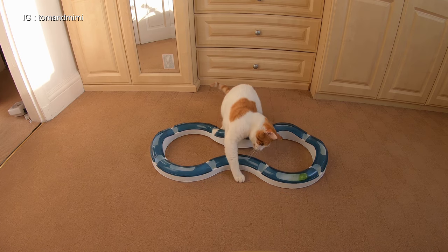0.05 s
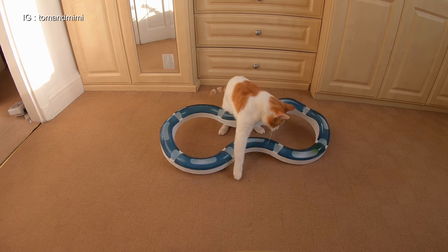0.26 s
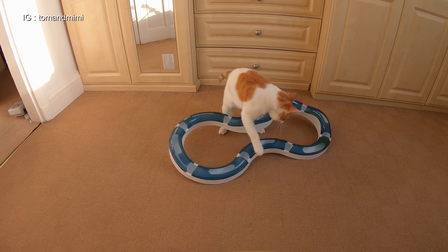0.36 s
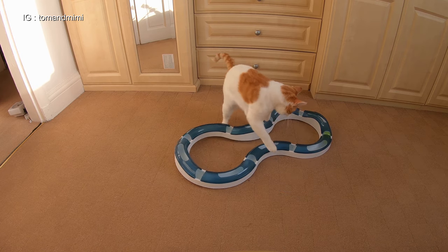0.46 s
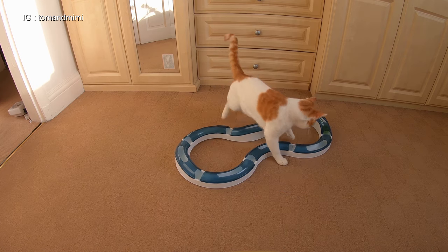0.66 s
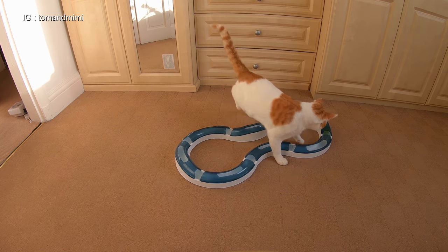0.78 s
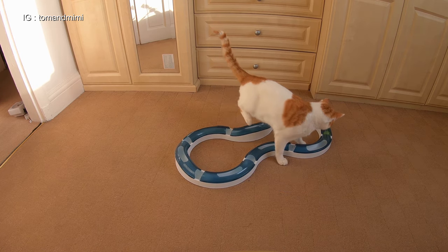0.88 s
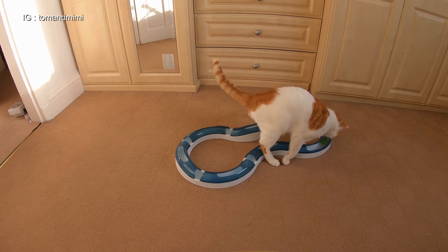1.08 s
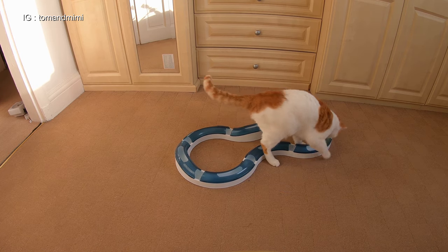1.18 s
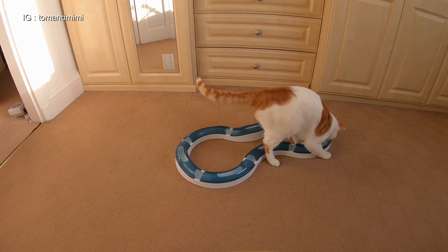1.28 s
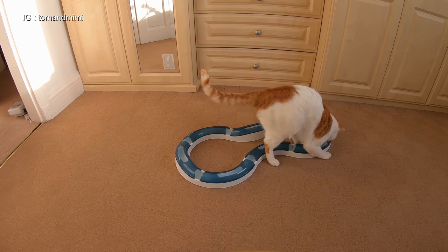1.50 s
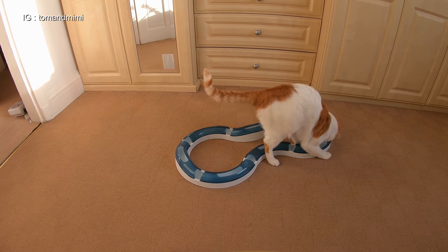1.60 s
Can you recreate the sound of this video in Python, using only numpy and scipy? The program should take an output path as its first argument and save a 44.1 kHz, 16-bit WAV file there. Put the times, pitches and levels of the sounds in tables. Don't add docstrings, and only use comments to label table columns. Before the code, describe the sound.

A cat's paws rattle a hollow plastic ball track, with sharp clicks and a clattering shove on carpet

```python
import sys
import numpy as np
from scipy import signal
from scipy.fft import rfft, irfft
from scipy.io import wavfile
from scipy.ndimage import uniform_filter1d

SR = 44100
rng = np.random.default_rng(int(sys.argv[2]) if len(sys.argv) > 2 else 0)


def int16_out(signal):
    q = np.round(np.clip(np.atleast_2d(signal).T, -1, 1) * 32767)
    wavfile.write(sys.argv[1], SR, q.astype(np.int16))


def makeup_ratio(level_db):
    decades = np.asarray(level_db, float) / 20
    return 10 ** decades


N = 72765

# start in seconds, peak level in dB, pitch in Hz, crack level in dB, crack pitch in Hz.
CLICKS = [(0, -33, 960, -6.5, 4440), (.018, -35, 1430, -28, 2800), (.187, -40, 1390, -6, 4400),
          (.208, -27.5, 2200, -25, 5170), (.219, -43, 1500, 1.5, 4850), (.2235, -29.5, 1040, -2.5, 2580),
          (.238, -37, 1500, -17, 2930), (.253, -45, 2040, -11, 2830), (.2765, -23, 3300, -4.5, 5580),
          (.2855, -27, 1900, -11, 5800), (.3755, -29, 930, -2.5, 3000), (.393, -31.5, 1050, -6, 2900),
          (.401, -31.5, 1500, -8.5, 7100), (.416, -31, 1290, -9.5, 2790), (.452, -33.5, 1050, -7, 3160),
          (.4615, -21, 980, -7.5, 4000), (.473, -34, 1160, -8, 2800), (.512, -29.5, 1480, -5, 3040),
          (.522, -42, 1030, -2.5, 4800), (.6435, -19, 1360, -10, 4200), (.691, -32, 1800, -4.5, 4200),
          (.741, -31, 1900, -23, 4200), (.7532, -16, 1646, -10.5, 4350), (.805, -32, 850, -1, 2700)]
SHOVE_CLATTER = [(.560, -23.5, 1086, -16.5, 2200), (.564, -17.5, 1500, -20.5, 2500),
                 (.568, -21, 1127, -6, 3000), (.572, -16.5, 1550, -11.5, 2300),
                 (.576, -17, 1620, -11, 4770), (.580, -20.5, 1500, -10, 3000),
                 (.584, -21.5, 1700, -10, 3200), (.588, -24.5, 1576, -18.5, 2700),
                 (.592, -24, 1350, -17.5, 3030), (.599, -30.5, 1270, -6, 2400),
                 (.607, -39, 955, -15.5, 2200)]
RESTING_TAPS = [
    (1.087, -41.5, 1400, -13.5, 3100),
    (1.096, -44, 727, -9, 1980),
    (1.147, -53.5, 4500, 2.5, 4900),
    (1.148, -59.5, 7000, 2.5, 7600),
    (1.155, -39, 1060, -30.5, 2920),
    (1.165, -45, 1150, -13, 2187),
    (1.532, -47.5, 640, -16.5, 2700),
    (1.540, -53, 654, -24, 2300),
]
PAW_NUDGES = [(.819, -20, 860, -20.5, 2420), (.836, -28.5, 840, -37, 2500), (1.02, -43.5, 827, -29, 3500),
              (1.036, -36, 860, -28.5, 2380), (1.05, -48, 834, -26, 3500), (1.195, -41, 910, -14, 3100),
              (1.335, -53, 1103, -28, 2300), (1.356, -44, 706, -37, 2487), (1.373, -47, 767, -37, 2430),
              (1.433, -64.5, 650, -24, 2755), (1.451, -45.5, 710, -28, 2790), (1.47, -60, 690, -20, 2460)]
JOINT_CHATTER = [(.2115, -32.5, 1700, -23, 2300), (.228, -36, 1100, -25, 2196),
                 (.243, -32, 1000, -17, 2390), (.299, -33.5, 2200, -18.5, 2500),
                 (.310, -33, 1150, -20.5, 2600), (.355, -37.5, 950, -5, 3200),
                 (.3975, -29, 1500, -19.5, 2220), (.406, -35.5, 1500, -10, 2625),
                 (.425, -34, 1600, -8, 4400), (.455, -27.5, 1600, -17, 2300), (.466, -29, 1200, 0, 2800),
                 (.482, -36, 900, -26.5, 2435), (.491, -38.5, 1100, -9, 2200), (.515, -34, 1100, -1, 2800),
                 (.525, -33.5, 1700, -24, 2300), (.533, -45, 800, -12, 2215), (.650, -27, 1900, -6.5, 2600),
                 (.6555, -25, 1100, -17, 2200), (.666, -32, 1100, -12, 2300),
                 (.675, -31.5, 1400, -10.5, 2390), (.701, -31.5, 1200, -26, 2600),
                 (.758, -25, 1600, -5.5, 2555), (.7655, -21, 1050, -21.5, 2196),
                 (.773, -30, 1100, -19, 2300), (.785, -30.5, 1000, -16.5, 2410),
                 (.812, -31.5, 1000, -18.5, 2300), (.845, -29, 1000, -22, 2300)]
# pitch in Hz, level in dB, time to fade by 60 dB in seconds.
TRACK_WALLS = [(620, 4.5, 0.028), (860, 12, 0.015), (1099, -2, 0.036), (1189, 0, 0.034), (1454, 7.5, 0.019),
               (1534, 8.5, 0.019), (1900, -2, 0.059), (2300, 7, 0.03), (2700, 14, 0.0079),
               (3200, 1.5, 0.065), (4000, -30.5, 0.029), (4200, -19.5, 0.024), (5200, -33, 0.0044)]
# time in seconds, level in dB, brightness in dB.
MOTION = [(0, -47, -4), (0.077, -48.5, -32.5), (.15, -53.5, -11), (.21, -47, -8.5), (.265, -46.5, -21),
          (.34, -52, -28.5), (.37, -43, -4), (0.431, -51, -2.5), (.555, -48.5, -6.5), (.61, -53, -2),
          (.68, -40, -16.5), (0.746, -44.5, -11), (0.83, -39, -11), (.88, -82, -18.5), (1.002, -63.5, -26),
          (1.3, -69, -35), (1.392, -61, -30), (1.65, -65, -27.5)]
# pitch in Hz, level in dB.
RATTLE_COLOUR = [(450, -12), (700, -2.5), (1300, -4), (2200, -3.5), (3500, -13.5)]
# pitch in Hz, level in dB per Hz.
RUSTLE_COLOUR = [(1500, -6.5), (2500, 0), (4000, -4.5), (7500, -16.5), (10000, -20), (15000, -26)]
# start in seconds, level in dB, pitch in Hz, time to fade by 60
# dB in seconds (.3 at most).
THUDS = [(.025, -62, 62, .1), (.21, -60, 65, .08), (.27, -60, 70, .08), (.355, -48, 144, 0.047),
         (.385, -29, 150, 0.03), (.385, -50, 69.5, 0.05), (0.475, -54, 30.8, 0.2), (.566, -24, 165, 0.074),
         (.562, -30.5, 256, 0.12), (0.561, -29, 346.2, .1), (.566, -28.5, 444, .08),
         (0.563, -28, 61.2, 0.1), (.59, -25, 140, 0.075), (0.601, -29.5, 66.5, 0.26),
         (0.598, -32, 28.85, 0.98), (.725, -26, 79, 0.045), (.765, -37.5, 63.6, 0.19), (.79, -43, 28, 0.4),
         (.85, -41, 30.4, 0.19), (1.10, -66, 140, .1)]
# pitch in Hz, time to fade by 60 dB in seconds, level in dB.
ROOM_FADE = [(175, 0.34, 0.5), (500, 0.21, -1.5), (1500, 0.24, -1.5), (4000, 0.26, -6), (9300, 0.17, 7)]
# pitch in Hz, likeness from -1 to 1.
LIKENESS = [(100, 1), (330, 1), (700, 0.35), (3000, 0.32), (6000, 0.33), (11000, -0.6)]
# pitch in Hz, level in dB per Hz.
AIR_COLOUR = [(18, -11), (30, -14), (60, -23.5), (110, -18.5), (328, -7.5), (511, -13.5), (774, -4.5),
              (928, -12), (1270, -6), (1830, -25.5), (15000, -44)]

SNAP_DB, WALLS_DB, CRACK_DB = 2, -13, 0
WALL_REACH_OCTAVES = 0.99
WALL_LUCK_DB, WALL_DETUNE, WALL_DAMPING = 3.0, 0.088, 0.66
CRACK_WIDTH_HZ, CRACK_FADE_S, SPARK_FADE_S = 1500, .002, .003
BLOW_DELAY_S = .001
SHARP_S, CLATTER_S, TAP_S, PADDED_S, LOOSE_S = .00012, .0014, .0005, .003, .0007
GRAINS_PER_S, GRAIN_SPREAD_DB, GRAIN_CYCLES = 1500, 3, 20
RATTLE_DB, RUSTLE_DB, RUMBLE_DB = -3, 0.5, -23.5
THUD_RISE_S, THUD_LEFT_DB = .006, -4
FIRST_WALL_S, ROOM_BUILD_S, CONTACT_SHIFT_S = .006, .003, .011
ROOM_DB, ROOM_LEFT_DB, TRACK_LEFT_DB, AIR_DB = 2.5, -0.6, -1.9, -69.5
TRACK_LOW_HZ, MIC_TOP_HZ, ABOVE_TOP_DB = 215, 11390, -18


def rms_one(x):
    return x / np.sqrt(np.mean(x ** 2) + 1e-20)


def at_hz(points, hz, column=1):
    table = np.array(points)
    return np.interp(np.log(hz + 1e-3), np.log(table[:, 0]), table[:, column])


def coloured(noise, spectrum):
    length = noise.shape[-1]
    hz = np.fft.rfftfreq(length, 1 / SR)
    return rms_one(irfft(rfft(noise) * makeup_ratio(at_hz(spectrum, hz)), length))


def band(x, low_hz, high_hz):
    return signal.sosfilt(signal.butter(2, [low_hz, high_hz], "band", fs=SR, output="sos"), x)


def ring(x, hz, t60):
    radius = makeup_ratio(-60 / (t60 * SR))
    turn = 2 * np.pi * hz / SR
    return signal.lfilter([0, np.sin(turn)], [1, -2 * radius * np.cos(turn), radius * radius], x + 1e-18)


def ears(left_db):
    return makeup_ratio([[left_db / 2], [-left_db / 2]])


def wall_ringing(blow_hz, luck, t):
    walls = np.zeros(len(t))
    for j, ((hz, level_db, t60), (level_luck, pitch_luck)) in enumerate(zip(TRACK_WALLS, luck)):
        distance = np.log2(hz / blow_hz) / WALL_REACH_OCTAVES
        db = WALLS_DB + level_db + WALL_LUCK_DB * level_luck - 5.22 * distance ** 2
        tone = np.sin(2 * np.pi * hz * (1 + WALL_DETUNE * pitch_luck) * t)
        walls += (-1) ** j * makeup_ratio(db) * tone * makeup_ratio(-60 * t / (WALL_DAMPING * t60))
    return walls


def strikes(rows, contact_s, spark_db, cycles):
    length = 4096
    out = np.zeros(N + length)
    t = np.arange(length) / SR
    chance = rng.standard_normal((len(rows), len(TRACK_WALLS), 2))
    noise = rng.standard_normal((len(rows), 2, length))
    rise = 1 - np.exp(-(t / contact_s) ** 2)
    for (start, db, hz, crack_db, crack_hz), luck, (hiss, fizz) in zip(rows, chance, noise):
        snap = np.sin(2 * np.pi * hz * t) * np.exp(-t * hz / cycles) / np.sqrt(cycles)
        focus = rms_one(ring(fizz, crack_hz, 2.16 / CRACK_WIDTH_HZ))
        focus = focus * np.exp(-t / (CRACK_FADE_S + 2 * contact_s))
        spark = makeup_ratio(spark_db) * coloured(hiss, RUSTLE_COLOUR) * np.exp(-t / SPARK_FADE_S)
        crack = makeup_ratio(CRACK_DB + crack_db) * (spark + focus)
        blow = makeup_ratio(SNAP_DB) * snap + wall_ringing(hz, luck, t) + crack
        i = int((start + BLOW_DELAY_S) * SR)
        out[i:i + length] += makeup_ratio(db) * blow * rise
    return out[:N]


def track_motion():
    times, levels_db, brights_db = np.transpose(MOTION)
    t = np.arange(N) / SR
    level_db = np.interp(t, times, levels_db)
    bright_db = np.interp(t, times, brights_db)
    sizes = makeup_ratio(GRAIN_SPREAD_DB * np.minimum(rng.exponential(1, N), 4)) * rng.choice([-1, 1], N)
    grains = sizes * (rng.random(N) < GRAINS_PER_S / SR)

    patch = rng.integers(0, 30, N)
    rattle = np.zeros(N)
    for k, hz in enumerate(np.geomspace(450, 3500, num=30)):
        tilt_db = 0.37 * (bright_db + 11.5) * np.log2(hz / 800)
        gain = makeup_ratio(at_hz(RATTLE_COLOUR, hz) + tilt_db) * np.sqrt(hz)
        rattle += gain * ring(grains * (patch == k), hz, GRAIN_CYCLES / hz)

    rustle = coloured(rng.standard_normal(N) + .5 * grains, RUSTLE_COLOUR)
    rumble = rms_one(band(rng.standard_normal(N), 240, 560))
    mix = makeup_ratio(RATTLE_DB) * rms_one(rattle) + makeup_ratio(RUMBLE_DB) * rumble
    return makeup_ratio(level_db) * (mix + makeup_ratio(RUSTLE_DB + bright_db) * rustle)


def floor_thuds():
    out = np.zeros((2, N))
    t = np.arange(N) / SR
    for start, db, hz, t60 in THUDS:
        since = np.maximum(t - start, 0)
        right_lead = np.clip(2.0 - 1.1 * np.log(hz / 28), 0, 3)
        tone = np.sin(2 * np.pi * hz * since + np.array([[0], [right_lead]]))
        rise = 1 - np.exp(-(since / THUD_RISE_S) ** 2)
        out += makeup_ratio(db - 60 * since / min(t60, .3)) * rise * tone
    return out * ears(THUD_LEFT_DB)


def bedroom(x):
    t = np.arange(SR // 2) / SR
    edges = 120 * 2. ** np.arange(0, 7.3, .5)
    noise = rng.standard_normal((2, 2, 4, SR // 2))
    tail = 0
    for k, (low, high) in enumerate(zip(edges, edges[1:])):
        hz = np.sqrt(low * high)
        shared, opposed = band(noise[k % 2], low, high)
        alike = np.clip(at_hz(LIKENESS, hz), -.9, 1)
        t60 = at_hz(ROOM_FADE, hz)
        pair = np.sqrt(1 + alike) * shared + np.sqrt(1 - alike) * opposed * [[[1]], [[-1]]]
        fade = makeup_ratio(at_hz(ROOM_FADE, hz, column=2) - 60 * t / t60)
        tail = tail + pair * fade / np.sqrt(t60 * SR / 14)
    tail = tail * (1 - np.exp(-np.maximum(t - FIRST_WALL_S, 0) / ROOM_BUILD_S))

    place = (np.arange(N) / SR / CONTACT_SHIFT_S - np.arange(4)[:, None]) % 4
    share = np.sin(np.pi / 2 * np.minimum(place, 2)) ** 2
    echoes = signal.fftconvolve((x * share)[None], tail, axes=2)[:, :, :N]
    return makeup_ratio(ROOM_DB) * echoes.sum(axis=1)


def still_air():
    return makeup_ratio(AIR_DB) * coloured(rng.standard_normal((2, N)), AIR_COLOUR)


def scene():
    track = strikes(CLICKS, SHARP_S, spark_db=-10.5, cycles=1.2)
    track += strikes(SHOVE_CLATTER, CLATTER_S, spark_db=-4.5, cycles=5.0)
    track += strikes(RESTING_TAPS, TAP_S, spark_db=-6.0, cycles=3.0)
    track += strikes(PAW_NUDGES, PADDED_S, spark_db=-12, cycles=3.2)
    track += strikes(JOINT_CHATTER, LOOSE_S, spark_db=-3, cycles=1.6)
    track += track_motion()
    track = signal.sosfilt(signal.butter(4, TRACK_LOW_HZ, "high", fs=SR, output="sos"), track)
    floor = floor_thuds()
    floor_to_room = 0.62 * uniform_filter1d(floor.mean(axis=0), size=5)
    room = ears(ROOM_LEFT_DB) * bedroom(track + floor_to_room)
    return ears(TRACK_LEFT_DB) * track + room + floor + still_air()


def low_pass(x):
    return signal.sosfilt(signal.butter(12, 15550, fs=SR, output="sos"), x)


def record(dry):
    dull = signal.sosfilt(signal.cheby2(8, 50, MIC_TOP_HZ, fs=SR, output="sos"), dry)
    mix = dull + makeup_ratio(ABOVE_TOP_DB) * (dry - dull)
    return low_pass(mix)


dry = scene()
out = record(dry)
int16_out(out)
```